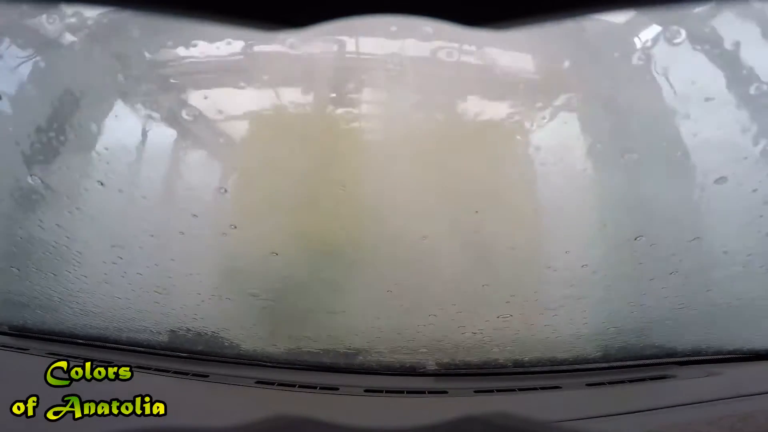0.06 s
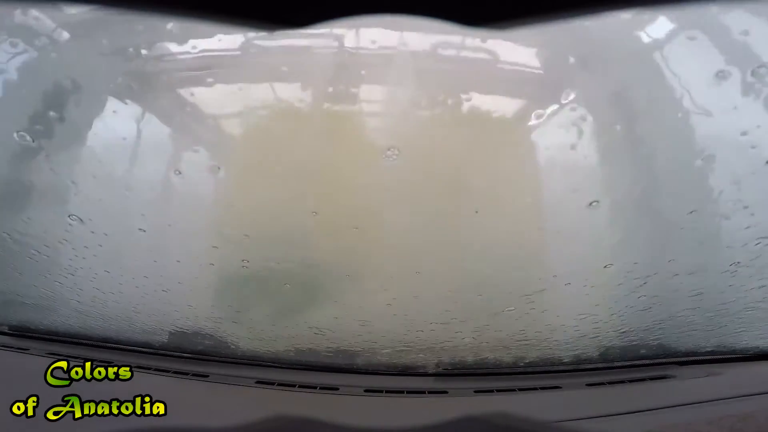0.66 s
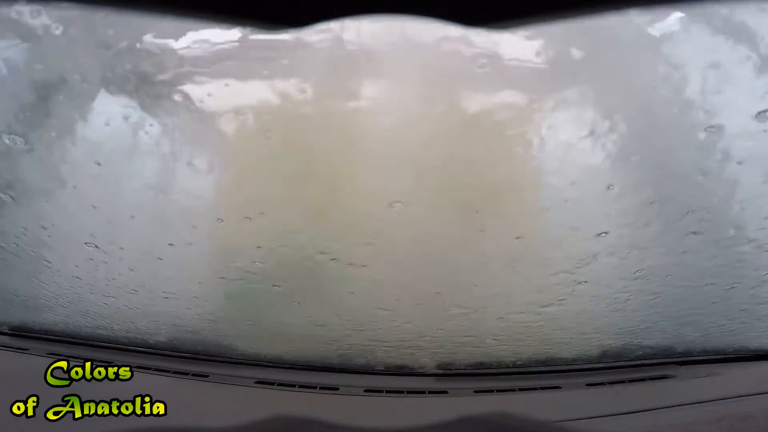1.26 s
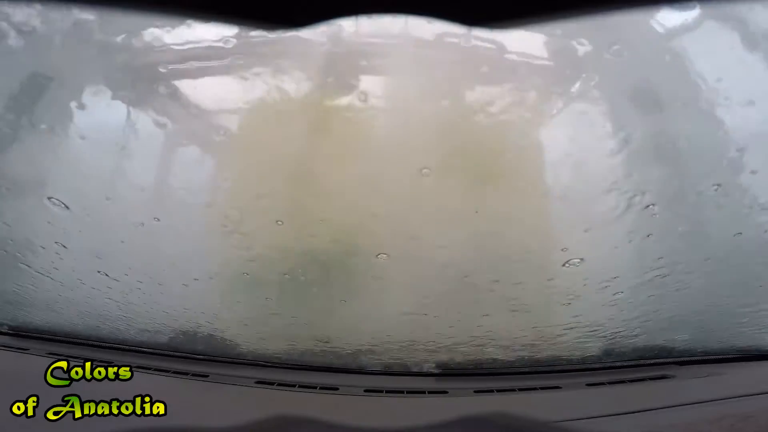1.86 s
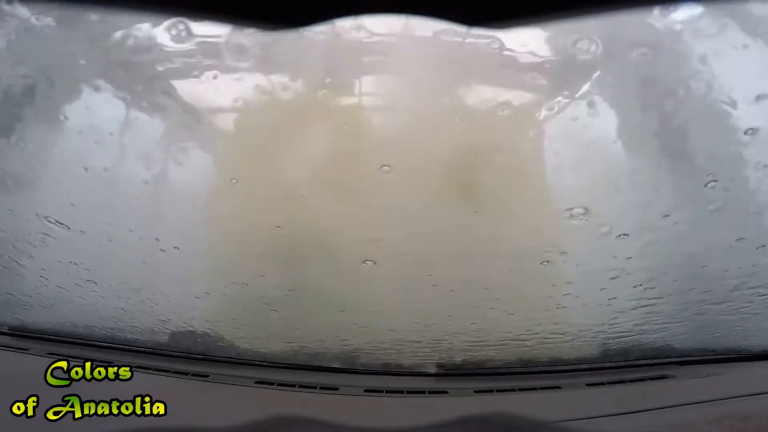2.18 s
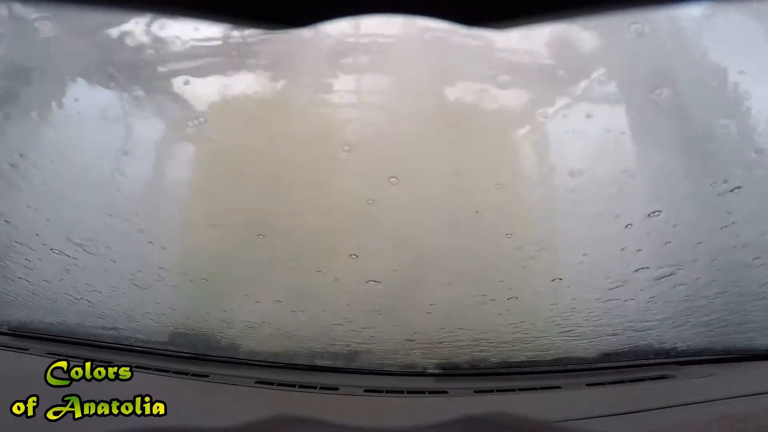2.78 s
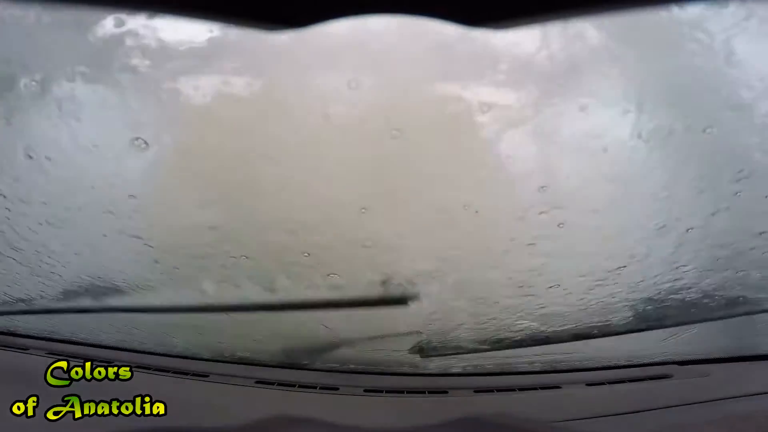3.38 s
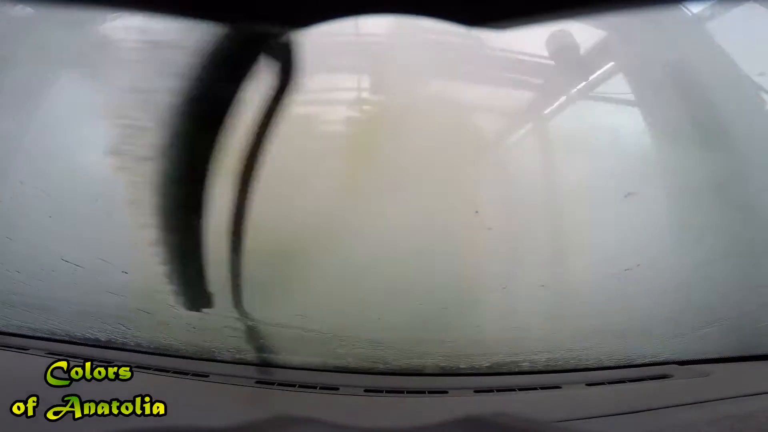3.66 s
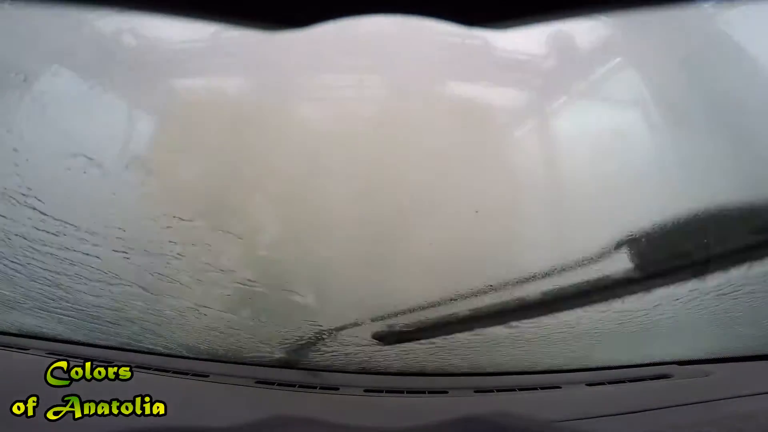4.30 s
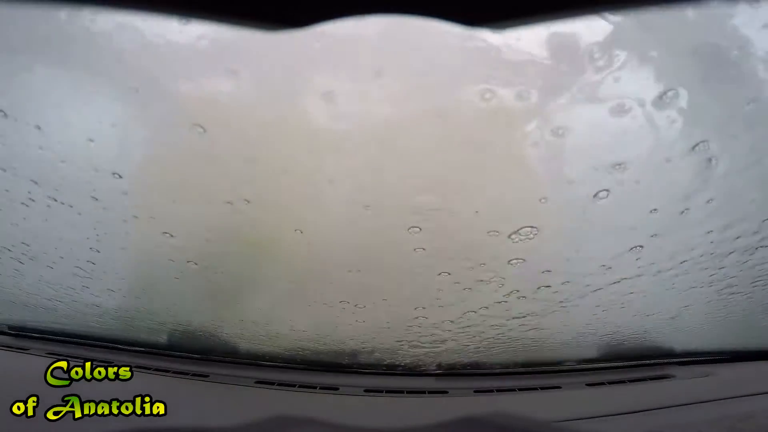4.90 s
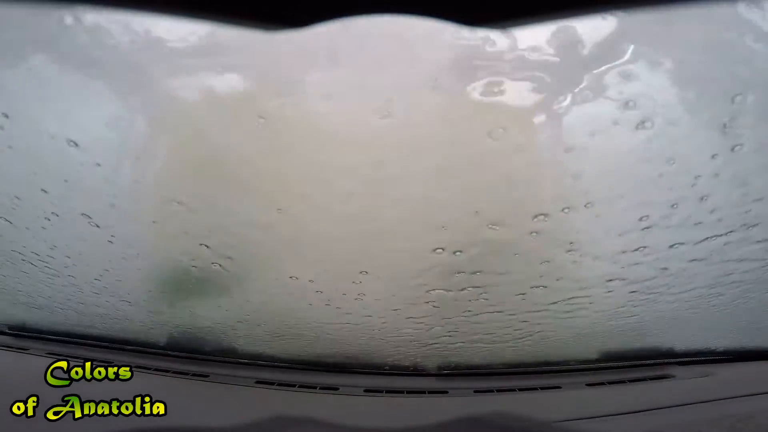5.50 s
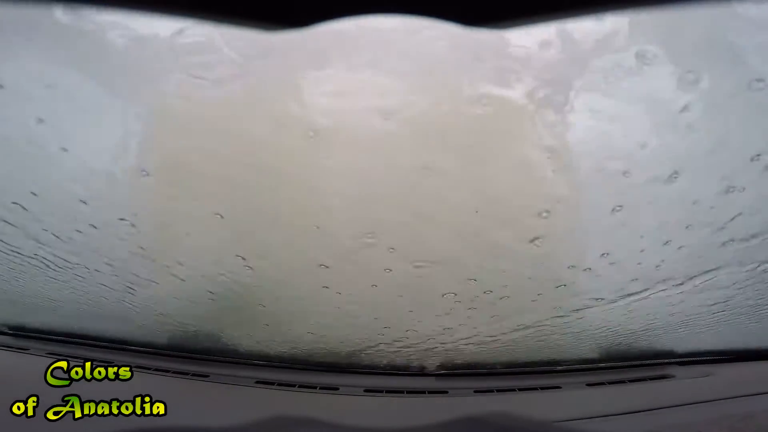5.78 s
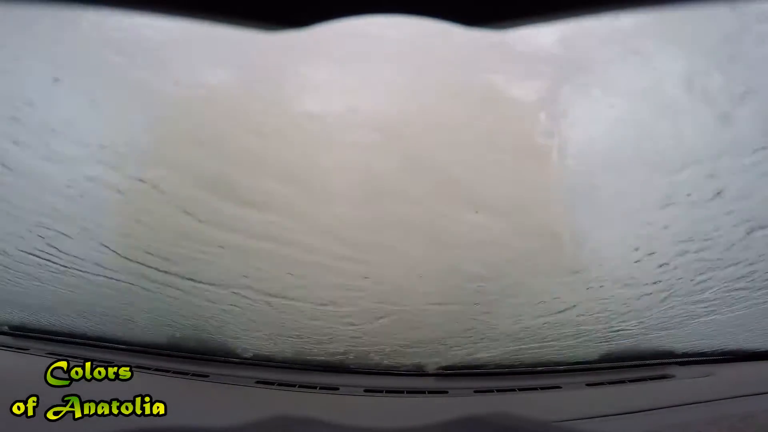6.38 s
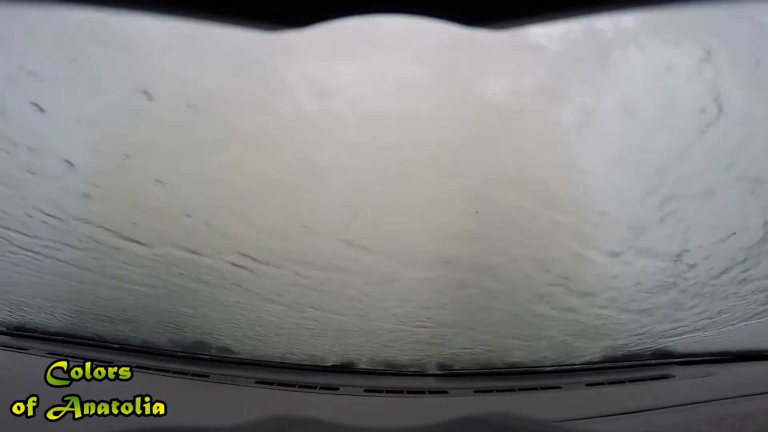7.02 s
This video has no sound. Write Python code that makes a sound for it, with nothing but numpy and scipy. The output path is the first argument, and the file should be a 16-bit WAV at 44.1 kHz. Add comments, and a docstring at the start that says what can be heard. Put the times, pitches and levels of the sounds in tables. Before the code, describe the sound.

A low boom fills the cabin of a car rolling through an automatic wash, with dull pelting on the roof, steady spray hiss and a wavering machine hum. Midway comes a short knock and a single wet wiper sweep, out and back. Brushes, faint at first, scrub louder as they approach, and a few tiny drips tick on the windscreen late on. The microphone is inside the closed car.

```python
"""Inside a closed car rolling through an automatic car wash. From the start the cabin booms, jets and
cloth drum on the panels and spray hisses on the glass, while motors and a pump hum through the body.
At 3.3 s the wiper knocks into one wet sweep, up and back, as the spray arch lifts the hiss and a thin
nozzle whistle. After 6 s a few drops tick on the windscreen, and the scrubbing of the brushes,
faint at first, grows to its loudest at the end."""
import sys
import numpy as np
from scipy import signal
from scipy.fft import rfft, irfft
from scipy.io import wavfile
from scipy.ndimage import uniform_filter1d

SR = 44100
rng = np.random.default_rng(int(sys.argv[2]) if len(sys.argv) > 2 else 0)


def waveform_to_disk(signal):
    """Save audio, clipped to [-1, 1], as 16-bit WAV at the path in sys.argv[1]."""
    frames = np.transpose(np.atleast_2d(signal))
    scaled = np.clip(frames, -1, 1) * 32767
    samples = np.round(scaled).astype(np.int16)
    wavfile.write(sys.argv[1], SR, samples)


N = 319725
T = np.arange(N) / SR
HZ = np.fft.rfftfreq(N, 1 / SR)
HIT_T = np.arange(SR // 5) / SR  # time axis of a one-shot


def amp(db):
    """Decibels to gain."""
    return 10 ** (np.asarray(db) / 20)


def unit(x):
    """Scales to rms 1."""
    return x / np.sqrt(np.mean(x ** 2) + 1e-20)


def colour(x, eq, extra_db=0):
    """Shapes x with an EQ curve joined on a log frequency axis; rms 1."""
    hz, db = np.transpose(eq)
    eq_db = np.interp(np.log(HZ + 1), np.log(hz), db) + extra_db
    return unit(irfft(rfft(x) * amp(eq_db), N))


def drift(rate):
    """A smooth random modulator with up to about `rate` swings a second; rms 1."""
    lowpass = np.exp(-(HZ / rate) ** 2) * (HZ > 0)
    return unit(irfft(rfft(rng.standard_normal(N)) * lowpass, N))


def approach(far, near):
    """A steady ramp from the far value to the near one as the car rolls in."""
    return far + (near - far) * T / T[-1]


def swell(s, length):
    """A smooth hump of height 1 at time s, about `length` seconds wide."""
    return np.exp(-(2 * (T - s) / length) ** 2)


def lifts(rows):
    """Sums a table of swells into one fader curve for each dB column."""
    return sum(np.outer(dbs, swell(s, length)) for s, length, *dbs in rows)


def add(mix, s, sound):
    """Mixes a sound in at time s."""
    part = mix[round(s * SR):][:len(sound)]
    part += sound[:len(part)]


def impacts(per_s, spread_db):
    """A shower of tiny blows, mostly small and a few large."""
    size = amp(spread_db * np.minimum(rng.exponential(1, N), 4))
    return unit(size * rng.choice([-1, 1], N) * (rng.random(N) < per_s / SR))


def buffeting(eq, level_db):
    """The shell's lowest modes: low noise, evened out so that it rides level_db."""
    noise = colour(rng.standard_normal(N), eq)
    envelope = np.sqrt(uniform_filter1d(noise ** 2, size=5000) + 1e-6)
    return noise / envelope * amp(level_db)


# sub boom of the cabin: f/Hz, gain/dB
CABIN_EQ = [(5, -40), (14, -11), (25, -8), (33, -3), (42, 0), (52, -2), (63, -1), (73, -12), (100, -22),
            (160, -34), (1000, -100)]
# the roof flexing under the jets: f/Hz, gain/dB
ROOF_EQ = [(60, -40), (82, -12), (88, -6), (96, 0), (106, -5), (126, -7), (155, -20), (1000, -100)]
# heavy surges of water: t/s, length/s, cabin lift/dB, roof lift/dB
WATER_SURGES = [(2.3, .4, 3, -2), (2.94, 0.14, 4, 2), (3.147, 0.32, -0.5, 6), (4.0, 0.17, 3.5, 4),
                (5.07, 0.13, 5, -0.5), (5.4, 0.7, -1, 4.5), (5.94, 0.068, 3, 4.5), (6.38, .2, 1.5, 4)]

def rumble(gusts_per_s=6.3, cabin_gust_db=2.0, roof_gust_db=1.5):
    """Gusts and surges of water shake cabin and roof, building on the way in."""
    cabin_lift_db, roof_lift_db = lifts(WATER_SURGES)
    cabin_db = approach(-24.5, -20.5) + cabin_lift_db + cabin_gust_db * drift(gusts_per_s)
    roof_db = approach(-31, -25.5) + roof_lift_db + roof_gust_db * drift(gusts_per_s)
    return buffeting(CABIN_EQ, cabin_db) + buffeting(ROOF_EQ, roof_db)


# resonances of windscreen and roof: f/Hz, width/Hz, lift/dB
PANEL_PEAKS = [(550, 17, 4), (700, 52, 2.5), (827, 42, 2), (1018, 61, 2.5), (1346, 41, 2), (1593, 27, 5),
               (1848, 42, 2), (1970, 39, 4), (2315, 66, 2), (2740, 45, 1), (3000, 45, 1)]

def panel_resonance():
    """The EQ peaks, in dB, that glass and roof add to whatever strikes them."""
    return sum(db / (1 + (2 * (HZ - hz) / width) ** 2) for hz, width, db in PANEL_PEAKS)


# dull patter on the panels: f/Hz, gain/dB
DRUM_EQ = [(20, -60), (100, -15), (140, 0), (185, 1.8), (235, 2.7), (290, -1.2), (360, -5), (410, -3.8),
           (460, -10.7), (650, -14.3), (1000, -18.7), (1400, -24), (2000, -34), (9000, -90)]
# the pelting swells: t/s, length/s, lift/dB
PELTING_SWELLS = [(1.7, 2, 0.7), (7.0, 2.2, 2.5)]

def drumming(panel_db, level_db=-28):
    """Heavy water and cloth strips pelt the sheet metal."""
    patter = colour(impacts(per_s=2500, spread_db=1.5), DRUM_EQ, panel_db)
    return patter * amp(level_db + lifts(PELTING_SWELLS)[0])


# bright wash of spray on the glass: f/Hz, gain/dB
SPRAY_EQ = [(300, -12), (1000, -1), (2000, -.8), (3000, 0), (3800, -1), (4500, -4.5), (5600, -8.5),
            (6500, -13), (7500, -17), (9500, -21.7), (12000, -25.5), (15000, -29.3)]

def spray(panel_db, arch, level_db=-39.5, arch_db=.95, mist_db=.6):
    """Countless droplets merge into a hiss; a cloud of fine mist brightens its top end."""
    droplets = unit(impacts(per_s=6000, spread_db=2.0) + 1.45 * rng.standard_normal(N))
    hiss = colour(droplets, SPRAY_EQ, panel_db)
    treble = signal.sosfiltfilt(signal.butter(2, 7000, "high", fs=SR, output="sos"), hiss)
    mist = (amp(mist_db * swell(2.5, length=2.1)) - 1) * treble
    dip_db = -1.1 * swell(6.43, length=.7)  # the hiss ducks briefly
    return (hiss + mist) * amp(level_db + arch_db * arch + dip_db)


def beating(far_share, near_share, crest_s=.17, period_s=2.13):
    """The rise and fall, in dB, of a hum line as a weaker twin slides in and out of phase."""
    twin = approach(far_share, near_share) * np.exp(2j * np.pi * (T - crest_s) / period_s)
    return 20 * np.log10(abs(1 + twin))


# upper hum of the brush motors: harmonic number, level/dB
MOTOR_HARMONICS = [(4, -43), (5, -45), (6, -59), (7, -49), (8, -54)]
# the low hum swells: t/s, length/s, 2nd harmonic lift/dB, 3rd harmonic lift/dB
MOTOR_SWELLS = [(.65, 1.3, -1, 12), (2.25, 0.48, 1.5, 3), (3.98, 0.46, -3, 9), (5.05, 0.85, 2, -8),
                (6.4, 1.35, .5, 13)]

def motors(hz=70.2, second_db=-29.3, third_db=-41, waver_db=1.0, slip_turns=.062):
    """A stack of hum lines wavers as the load changes; the loudest beats slowly."""
    turns = hz * T + .018 * drift(rate=1.04)
    second_lift_db, third_lift_db = lifts(MOTOR_SWELLS)
    lines = [(2, second_db + second_lift_db + beating(far_share=.8, near_share=.2)),
             (3, third_db + third_lift_db)]
    lines += [(k, db + waver_db * drift(rate=1.8)) for k, db in MOTOR_HARMONICS]
    hum = np.zeros(N)
    for k, db in lines:
        line_turns = k * turns + slip_turns * drift(rate=2.8) + rng.random()
        hum += amp(db) * unit(np.cos(2 * np.pi * line_turns))
    return hum


# the pump tone pushes forward: t/s, length/s, lift/dB
PUMP_LIFTS = [(.6, .4, 4.5), (1.25, .55, 6.5), (2.0, 0.28, 4.5)]

def pump(hz=389.5, level_db=-39, waver_db=1.5, waver_hz=.27):
    """One slightly unsteady tone from the vanes of the water pump."""
    db = level_db + lifts(PUMP_LIFTS)[0] + waver_db * drift(rate=3.9)
    turns = np.cumsum(hz + waver_hz * drift(rate=3.1)) / SR
    return amp(db) * unit(np.sin(2 * np.pi * turns))


def nozzle_whistle(arch, hz=10094, width_hz=11, level_db=-81.5, arch_db=3.5, flicker_db=4.0):
    """A nozzle sings a faint, fuzzy tone high in the hiss, lifted under the spray arch."""
    turns = np.cumsum(hz + width_hz * drift(rate=60)) / SR
    db = level_db + arch_db * arch + flicker_db * drift(rate=6)
    return amp(db) * unit(np.sin(2 * np.pi * turns))


# midrange scrub of the brushes: f/Hz, gain/dB
BRUSH_EQ = [(100, -40), (300, -8), (410, 3.5), (520, .5), (750, 0), (1050, -1.3), (1350, -4), (1800, -15),
            (4000, -38), (12000, -80)]

def brushes(panel_db, far_db=-52.5, near_lift_db=15):
    """Wet bristles slap in uneven flurries, louder as the brushes near."""
    slaps = impacts(per_s=2200, spread_db=3) * amp(1.4 * drift(rate=50))
    db = far_db + near_lift_db * swell(7.47, length=6.6)
    return colour(slaps, BRUSH_EQ, panel_db) * amp(db)


# wet swish of the blade: f/Hz, gain/dB
WIPER_EQ = [(100, -40), (450, -3), (800, 1), (1350, 8.5), (2000, -22.5), (4000, -36), (12000, -64)]
# strokes, up and back: t/s, level/dB
WIPER_STROKES = [(3.3, -42), (3.92, -43)]

def wiper(panel_db, stroke_s=.65, attack_s=.09, release_s=.15, fade_db_per_s=20):
    """Rubber pushes a film of water over the glass; each stroke fades as the water clears."""
    push = np.zeros(N)
    for s, db in WIPER_STROKES:
        attack = np.clip((T - s) / attack_s, 0, 1)
        release = np.clip((s + stroke_s - T) / release_s, 0, 1)
        push += attack * release * amp(db - fade_db_per_s * np.maximum(T - s, 0))
    return colour(rng.standard_normal(N), WIPER_EQ, panel_db) * push


# jolts of the wiper arm: t/s, gain/dB
ARM_JOLTS = [(3.3295, -12.5), (3.3338, -15.5)]
# ring of the car body: f/Hz, level/dB, t60/s
BODY_MODES = [(105, 2, .05), (225, -2, .045), (480, -11, .03), (585, -7, .03), (690, -11, .035),
              (840, -14, .03), (1500, -16, .01), (2400, -21, .01)]

def wiper_knock():
    """The arm jerks into motion with a tight double hit that rings the damped body."""
    ring = sum(amp(db - 60 * HIT_T / t60) * np.sin(2 * np.pi * hz * HIT_T) for hz, db, t60 in BODY_MODES)
    knock = np.zeros(N)
    for s, db in ARM_JOLTS:
        add(knock, s, amp(db) * ring)
    return knock


# drops on the windscreen: t/s, level before the boost/dB
GLASS_DROPS = [(6.171, -51), (6.252, -51.5), (6.258, -55), (6.888, -55)]

def drop_ticks(t60=.012, low_cut_hz=6500, boost_db=7):
    """Single drops snap on the glass, each a tiny burst of bright noise."""
    low_cut = signal.butter(2, low_cut_hz, "high", fs=SR, output="sos")
    ticks = np.zeros(N)
    for s, db in GLASS_DROPS:
        burst = rng.standard_normal(len(HIT_T)) * amp(db + boost_db - 60 * HIT_T / t60)
        add(ticks, s, signal.sosfilt(low_cut, burst))
    return ticks


def scene():
    """The mono mix in the cabin: beds of rumble, water and machines, then wiper and drops."""
    panel_db = panel_resonance()
    arch = swell(3.9, length=3)  # the car passes under the spray arch
    water = drumming(panel_db) + brushes(panel_db) + spray(panel_db, arch)
    machines = motors() + pump() + nozzle_whistle(arch)
    return (rumble() + water + machines + wiper(panel_db) + wiper_knock() + drop_ticks())[None]


def record(dry, high_cut_hz=15320):
    """A steep high cut on the whole mix."""
    high_cut = signal.firwin(1023, high_cut_hz, window=("kaiser", 9), fs=SR)
    return signal.oaconvolve(dry, high_cut[None], "same")


dry = scene()
out = record(dry)
waveform_to_disk(out)
```